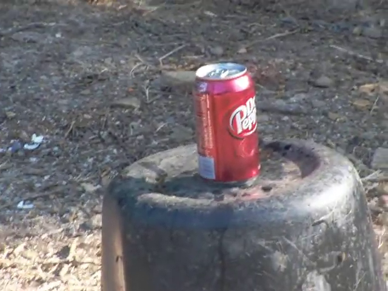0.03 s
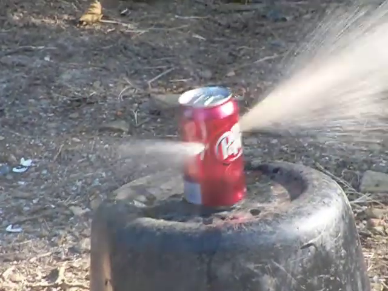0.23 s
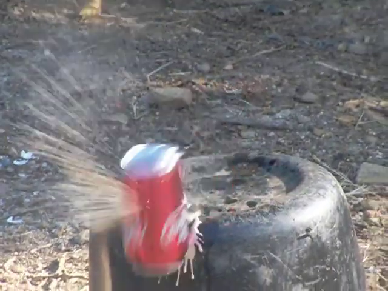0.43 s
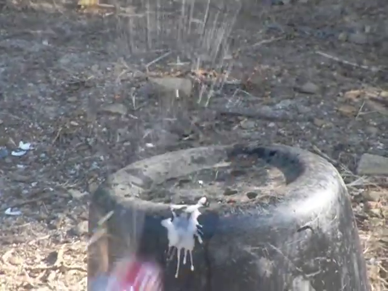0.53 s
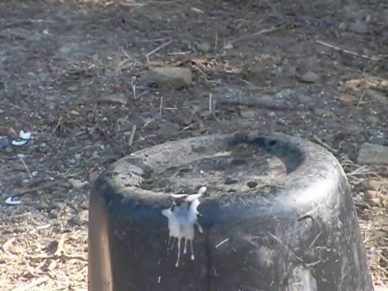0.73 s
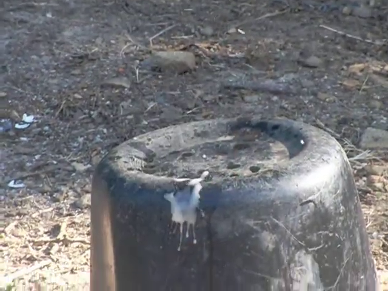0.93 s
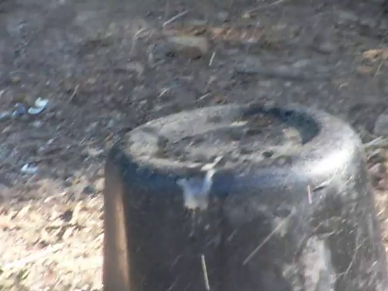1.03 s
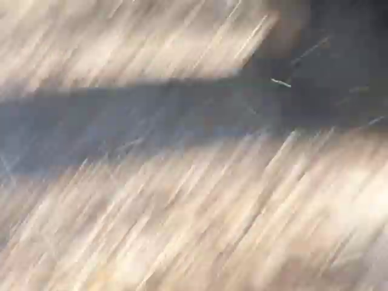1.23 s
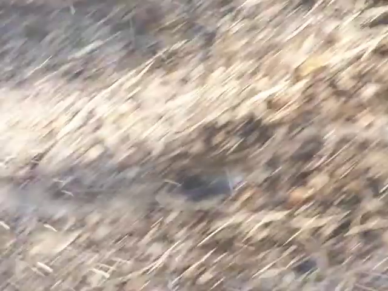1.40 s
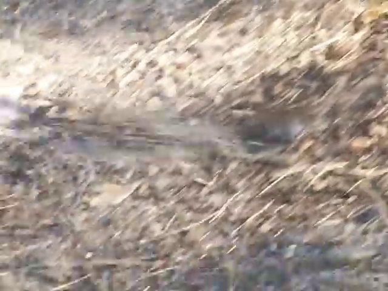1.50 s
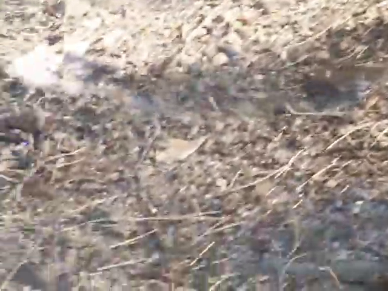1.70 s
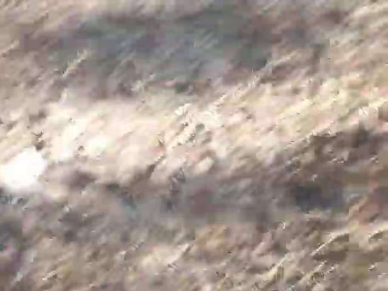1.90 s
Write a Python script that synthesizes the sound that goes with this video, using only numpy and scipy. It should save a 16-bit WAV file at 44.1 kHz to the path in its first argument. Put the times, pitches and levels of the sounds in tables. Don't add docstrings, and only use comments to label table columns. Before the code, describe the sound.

Sharp air gun shot punctures a metal can; it drops onto gravel, rattling and fizzing outdoors

```python
import sys
import numpy as np
from scipy import signal
from scipy.fft import rfft, irfft, next_fast_len
from scipy.io import wavfile
from scipy.ndimage import map_coordinates

SR = 44100
rng = np.random.default_rng(int(sys.argv[2]) if len(sys.argv) > 2 else 0)


def volts(x):
    e = np.asarray(x, float) / 20
    return 10 ** e


def materialize(psi):
    bounded = np.clip(np.atleast_2d(psi).T, -1, 1)
    quanta = np.round(bounded * 32767).astype(np.int16)
    wavfile.write(sys.argv[1], SR, quanta)


N = 85995
T = np.arange(N) / SR
STRIKE_S = .2595

# (frequency [Hz], level [dB per Hz])
FALL_TONE = [(290, -57), (500, -24), (937, -16), (1930, -21), (3750, -6.5), (4380, -5), (7370, -9),
             (8500, -7), (11000, -66), (18700, -120)]
# (frequency [Hz], level [dB])
STONE_BASS = [(300, -24), (700, -9.5), (1500, -0.5)]


def unit(x):
    return x / np.sqrt(np.mean(x ** 2) + 1e-20)


def filtered(x, points):
    size = next_fast_len(N + 8192)
    f, db = np.transpose(points)
    log_hz = np.log(np.fft.rfftfreq(size, 1 / SR) + 1)
    gain = volts(np.interp(log_hz, np.log(f + 1), db))
    return irfft(rfft(x, size) * gain, size)[:N]


def noise(points):
    return unit(filtered(rng.standard_normal(N), points))


def wobble(rate):
    return map_coordinates(rng.standard_normal(int(N * rate / SR) + 4), [T * rate])


def decay(s, db, t60, rise=0.000093):
    t = np.maximum(T - s, 0)
    return volts(db - 60 * t / t60) * (1 - np.exp(-t / rise))


def ring(s, modes, db, rough, rise=0.00026):
    out = np.zeros(N)
    for hz, level, t60 in modes:
        phase = 2 * np.pi * hz * (T - s) + rough * wobble(117.1)
        out += decay(s, db + level, t60, rise) * np.sin(phase)
    return out


def grains(rate, hz, cycles, spread_db):
    count = int(rate * N / SR)
    u, g = rng.random((count, 2)), rng.standard_normal(count)
    f = np.clip(hz * np.exp(0.41 * g), 2600, 9000)[:, None]
    k = np.arange(96)
    level = volts(-spread_db * np.log(u[:, 1:]))
    shape = level * np.sin(2 * np.pi * f * k / SR) * np.exp(-k * f / SR / cycles)
    place = (u[:, :1] * N).astype(int) + k
    return unit(np.bincount(place.ravel(), shape.ravel(), N + 96)[:N])


def air():
    # (time [s], level [dB])
    gusts = [(0.0, -55.5), (0.216, -53), (0.45, -54.5), (0.612, -59.5), (0.782, -56), (0.916, -61),
             (1.242, -57.5), (1.482, -61), (1.682, -56), (1.834, -54.5), (1.95, -49)]
    # (frequency [Hz], level [dB per Hz])
    air_tone = [(240, -17.5), (400, -8.5), (1000, -7), (2000, -13.5), (7000, -17.5), (8500, -23)]
    wind_tone = [(12, -27), (20, -1.5), (41, 3.5), (128, -9), (300, -13.5), (500, -27.5), (800, -85)]
    gust_db = np.interp(T, *np.transpose(gusts))
    lumps = volts(2 * wobble(24.77))
    wind = volts(2 + gust_db) * unit(lumps * noise(wind_tone))
    hiss_db = -63.5 + 0.55 * (gust_db - gust_db.mean())
    return volts(hiss_db) * noise(air_tone) + wind


def handling():
    # (time [s], level [dB], pitch [Hz])
    bumps = [(0.426, -37, 97), (0.707, -44, 257), (.89, -45.5, 260), (.972, -42.5, 252), (0.979, -41, 89),
             (1.142, -51, 130), (1.252, -38, 169), (1.376, -41, 130), (1.93, -43, 60.5)]
    return sum(ring(s, [(hz, db, 7 / hz)], 0, rough=0) for s, db, hz in bumps)


def rifle():
    clatter_s = [.2068, .2150, .2245, .2402]
    # (level [dB], fade time t60 [s])
    clatters = [
        (-22, 0.2),
        (-32, 0.058),
        (-31.5, 0.022),
        (-29, 0.045),
    ]
    # (frequency [Hz], level [dB per Hz])
    clatter_tone = [(400, -11), (1100, -13), (2600, -3.5), (4500, -0.5), (6900, -9), (8500, -7),
                    (10000, -50.5)]
    # (pitch [Hz], level [dB], t60 [s])
    steel = [(2100, -39, 0.066), (4060, -40.5, 0.22), (4990, -26, 0.087)]
    muzzle = [(240, -24, .015), (460, -16, .028), (700, -24, .022), (870, -18, .026), (1080, -21, .026)]
    push = [(82, -18, .017)]
    uneven = volts(2 * wobble(400))
    bursts = sum(decay(s, db, t60) for s, (db, t60) in zip(clatter_s, clatters))
    clatter = bursts * uneven * noise(clatter_tone)
    puff = ring(.2140, muzzle, 0, rough=.25, rise=.001)
    puff = puff + ring(.2108, push, 0, rough=0, rise=.003)
    return clatter + ring(clatter_s[0], steel, 0, rough=0.3) + puff


def tub():
    # (time [s], level [dB], rise time [s])
    hits = [(0.262, -22.5, 0.0026)]
    # (pitch [Hz], level [dB], t60 [s])
    tub_modes = [(208, 0, 0.1), (229.8, -0.5, 0.17), (271, 1.5, 0.062)]
    rock = [(207, -33, .1)]
    boom = sum(ring(s, tub_modes, db, 0, rise) for s, db, rise in hits)
    return boom + ring(.3645, rock, 0, 0, rise=.008)


def whistle():
    start_s, length_s, start_hz, sag_hz_per_s = .297, 0.062, 1050, 3200
    u = np.clip((T - start_s) / length_s, 0, 1)
    hz = start_hz - sag_hz_per_s * u * length_s + 12 * wobble(100)
    swell = np.sqrt(np.abs(np.sin(np.pi * u)))
    return volts(-43 - 6.9 * u) * swell * np.sin(2 * np.pi * np.cumsum(hz) / SR)


def knocks():
    # (time [s], level [dB], centre [Hz], length [s])
    stones = [(0.5203, -40, 3550, 0.0022), (0.5274, -41.5, 4100, 0.0022), (0.5317, -41.5, 3930, 0.0017),
              (0.536, -42, 2830, 0.0046), (0.5444, -38, 5000, .003), (0.549, -46.5, 4500, .003),
              (0.5577, -40.5, 4160, 0.0011), (0.5660, -31.5, 4760, 0.0012), (0.5675, -42, 4500, 0.0012),
              (0.5716, -39.5, 5440, 0.0016), (0.5753, -31, 4200, 0.001), (0.5766, -38, 5760, 0.004),
              (0.5744, -40.5, 2200, 0.0058), (0.5882, -39.5, 5500, 0.00059), (0.5884, -38, 5500, 0.00085),
              (0.592, -38.5, 4800, 0.0028), (.5975, -34, 5360, 0.0014), (0.604, -32, 5200, 0.0011),
              (0.7038, -32, 5000, 0.0041), (0.622, -43.5, 5000, 0.0035), (0.733, -38, 5000, 0.00076),
              (0.7339, -36.5, 5000, .0006), (.7371, -29.5, 5000, 0.00062), (0.739, -35.5, 5000, 0.00042),
              (0.744, -30, 5470, 0.00062), (0.7453, -30, 5500, 0.00058), (0.748, -29.5, 4980, 0.00084),
              (0.75, -33.5, 5560, 0.0011), (0.7506, -30, 5000, 0.00059), (0.7525, -34, 5000, 0.0015),
              (0.78, -42, 5460, 0.0018), (.7970, -41, 6000, 0.0013), (.8038, -32, 5940, 0.0014),
              (0.8075, -37.5, 4500, 0.00067)]
    rolls = [(0.8146, -32, 4700, 0.0008), (0.818, -31, 4800, 0.0012), (0.8214, -26, 4800, 0.0004),
             (.8229, -26, 4600, 0.0017), (.8253, -29, 5100, .0018), (0.8283, -35, 4700, 0.0005),
             (.8302, -35, 4700, .0004), (0.8327, -27, 4900, 0.0012), (0.8345, -33, 4800, 0.006),
             (.8366, -31, 5100, .0008), (.8406, -30, 5000, .0005), (.8466, -34, 5500, 0.0005),
             (0.8499, -35, 5500, 0.002), (0.8877, -34, 1020, 0.0016), (0.8984, -41, 5500, .004),
             (0.9265, -36, 5940, 0.0017), (.936, -42, 6000, .004)]
    t = np.arange(1024) / SR
    f, out = np.fft.rfftfreq(len(t), 1 / SR) + 1, np.zeros(N)
    chatter = volts(3 * wobble(1500))
    for s, db, hz, length in stones + rolls:
        octaves = .27 if rolls[0][0] <= s < .86 else .55
        band = np.exp(-(np.log2(f / hz) / octaves) ** 2 / 2)
        tone = unit(irfft(rfft(rng.standard_normal(len(t))) * band))
        gate = (1 - np.exp(-t / 0.00019)) * np.exp(-np.maximum(t - length, 0) / 0.0005)
        i = round(s * SR)
        knock = tone * gate * chatter[i:][:len(t)]
        level = np.sqrt(np.sum(knock ** 2) / np.sum(gate ** 2))
        out[i:][:len(t)] += volts(db) * knock / level
    return out


def ticks():
    # (time [s], peak level [dB], pitch [Hz])
    grain_hits = [(0.8808, -30.1, 4360), (0.8983, -31.4, 5520), (0.9008, -24.5, 4860),
                  (0.9063, -32.5, 5300), (0.9144, -31.3, 4900), (0.9231, -34.3, 5110),
                  (0.9277, -25.8, 5550), (0.931, -28.2, 5510), (0.9361, -30.4, 5490), (0.9397, -26.4, 5740),
                  (0.9442, -28.1, 5190), (0.9475, -28.4, 5190), (0.9503, -23.3, 5160),
                  (0.9521, -28.1, 5490), (0.9562, -26.1, 5010), (0.9602, -29.3, 3970),
                  (0.9636, -32.2, 3870), (0.9673, -33.0, 4940), (0.972, -32.3, 4490), (0.9752, -32.2, 5150),
                  (0.9822, -31.4, 4020), (0.9837, -34.1, 4240), (0.9865, -32.3, 3880),
                  (0.9893, -32.7, 4460), (1.0212, -32.3, 4430), (1.0584, -38.5, 5410),
                  (1.0671, -35.9, 5660), (1.0954, -27.1, 6070), (1.1018, -34.1, 4920),
                  (1.1115, -28.3, 5000), (1.1189, -36.7, 6000), (1.126, -34.6, 5750), (1.1323, -37.7, 4650),
                  (1.1378, -31.8, 4570), (1.1449, -36.9, 4480), (1.1474, -35.6, 4920),
                  (1.1615, -37.8, 5610), (1.1668, -25.5, 4250), (1.1684, -38.0, 5290),
                  (1.1698, -37.7, 4690), (1.1729, -33.1, 4670), (1.1838, -39.1, 6060)]
    s, db, hz = np.transpose(grain_hits)
    k = np.arange(64)
    cycles = hz[:, None] * k / SR
    shape = volts(db + 2)[:, None] * np.sin(2 * np.pi * cycles) * np.exp(-cycles / 1.3)
    place = np.round(s * SR).astype(int)[:, None] + k
    return np.bincount(place.ravel(), shape.ravel(), N)


def gravel():
    # (time [s], level [dB])
    crunch = [
        (.855, -75),
        (.868, -48),
        (.91, -50),
        (.92, -66),
        (.95, -52),
        (1.0, -62),
        (1.2, -85),
    ]
    grit = volts(np.interp(T, *np.transpose(crunch))) * grains(1000, hz=4500, cycles=1, spread_db=3.0)
    return filtered(knocks() + grit + ticks(), STONE_BASS)


def landing():
    # (time [s], level [dB], t60 [s], end [s])
    falls = [
        (.4273, -24, 0.012, .474),
        (0.431, -32, 0.2, .474),
        (.4705, -38, .012, .474),
        (0.4775, -39, 0.2, .498),
        (0.4845, -33, 0.014, .498),
        (0.586, -49, 0.28, 1.0),
    ]
    skid_bands = [2600, 3750, 5150, 6250, 7250]
    # (pitch [Hz], level [dB], t60 [s])
    dent = [(700, -28, .004), (1500, -27, .004), (3700, -22, .009), (6200, -20, .011), (7250, -21, .011)]
    clonk_modes = [(790, -41, .03), (1773, -29.5, 0.034), (2560, -37, 0.037)]
    skid = sum(decay(s, db, t60) * np.clip((end - T) / .002, 0, 1) for s, db, t60, end in falls)
    sing = []
    for hz in skid_bands:
        sing += [(hz - 400, 0), (hz, 6), (hz + 400, 0)]
    skid = skid * volts(3 * wobble(450)) * unit(filtered(noise(FALL_TONE), sing))
    clonk_s, hold_s = .7043, 0.0023
    damping = np.clip(volts(-5000 * (T - clonk_s - hold_s)), .25, 1)
    clonk = ring(clonk_s, clonk_modes, 0, rough=0) * damping
    return skid + clonk + ring(falls[0][0], dent, 0, rough=0.59)


def spurt():
    # (time [s], level [dB], end [s])
    gushes = [
        (1.6, -43, 1.604),
        (1.607, -35, 1.648),
        (1.655, -43, 1.72),
    ]
    rise_s = .003
    flow = sum(decay(s, db, .3, rise_s) * np.clip((end - T) / rise_s, 0, 1) for s, db, end in gushes)
    return flow * volts(2 * wobble(600)) * filtered(noise(FALL_TONE), STONE_BASS)


def spray():
    # (time [s], flow [dB], brightness [dB])
    hole = [(.40, -64.5, -8), (0.461, -42.5, -3), (.52, -57.5, -2), (0.621, -46, 0.5), (.70, -50.5, 0.5),
            (.78, -51, 4), (.95, -46, 0), (1.06, -51, 2.5), (1.2, -53, 2.5), (1.27, -50, 0),
            (1.32, -52, -2.5), (1.42, -49, -1.5), (1.51, -50, -0.5), (1.595, -47.5, 5), (1.661, -52.5, 2),
            (1.735, -55, 1.5), (1.8, -49, 0), (1.95, -49.5, 2.5)]
    # (frequency [Hz], level [dB per Hz])
    spray_tone = [(590, -58), (1000, -31), (1970, -10.5), (2580, -6.5), (3170, -6.5), (5010, -4),
                  (7230, -2.5), (8500, -5.5), (11000, -58.5), (18700, -120)]
    s, db, bright_db = np.transpose(hole)
    flow = volts(np.interp(T, s, db, left=-90) + wobble(45.3))
    bright_db = np.interp(T, s, bright_db) + wobble(16)
    drops = volts(-7) * grains(900, hz=5000, cycles=1.5, spread_db=2)
    fizz = unit(noise(spray_tone) + drops)
    low = filtered(fizz, [(3600, 0), (5400, -40)])
    return flow * (volts(-bright_db) * low + volts(bright_db) * (fizz - low))


def can_burst():
    # (frequency [Hz], level [dB per Hz])
    tear_tone = [(400, -20.5), (800, -12.5), (1300, -10), (2300, -6.5), (3800, -9.5), (6600, -5.5),
                 (8500, -13), (10000, -59.5)]
    # (pitch [Hz], level [dB], t60 [s])
    wall = [(940, -3, 0.035), (1132, -12.5, 0.17), (1283, 1, 0.034), (2363, -8.5, 0.087), (2329, 0, 0.14),
            (2510, -3, 0.092), (2910, -3, 0.07), (4540, -7, 0.1), (4780, -5.5, .14), (5510, -6, 0.14),
            (6150, -3, 0.071), (6770, 4, 0.062), (6830, -3, 0.092)]
    tear = decay(STRIKE_S, -17, t60=0.072)
    jet = decay(STRIKE_S, -31.5, t60=0.36)
    return (tear + jet) * noise(tear_tone) + ring(STRIKE_S, wall, -20.5, rough=1.0, rise=.001)


def scene():
    background = air() + handling()
    shot = rifle() + can_burst() + tub() + whistle()
    return (background + shot + landing() + gravel() + spray() + spurt())[None]


def band_limit(x):
    return signal.sosfilt(signal.butter(12, 9100, fs=SR, output="sos"), x)


def record(dry):
    # (frequency [Hz], level [dB])
    mic = [(7400, 0.5), (8000, -11), (9000, -19), (9300, -60), (9500, -90)]
    top = .21
    x = dry[0] / (1 + np.abs(dry[0] / top) ** 3) ** (1 / 3)
    return band_limit(filtered(x, mic)[None])


dry = scene()
out = record(dry)
materialize(out)
```